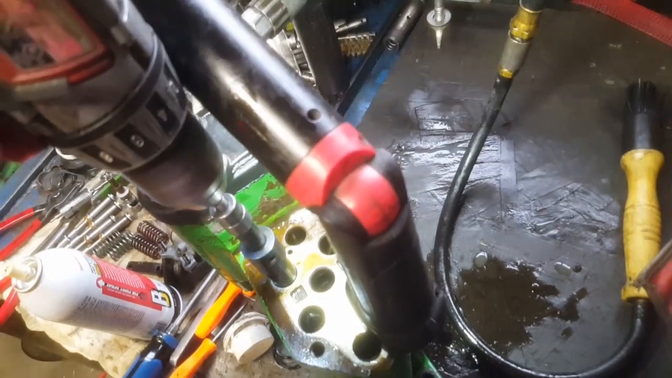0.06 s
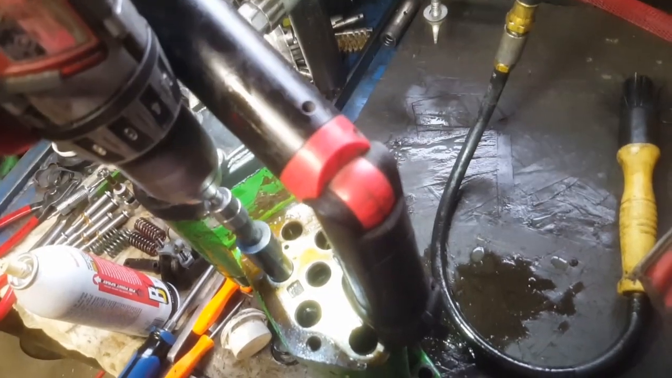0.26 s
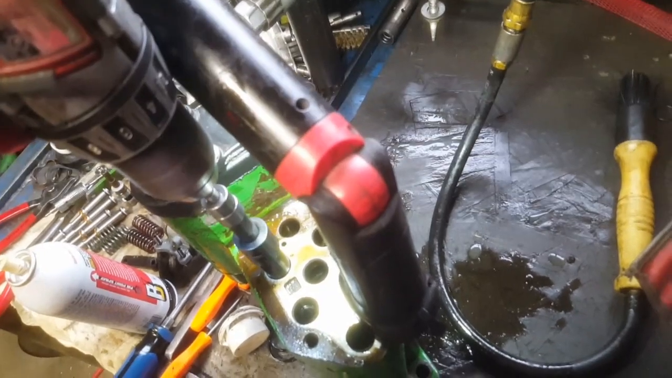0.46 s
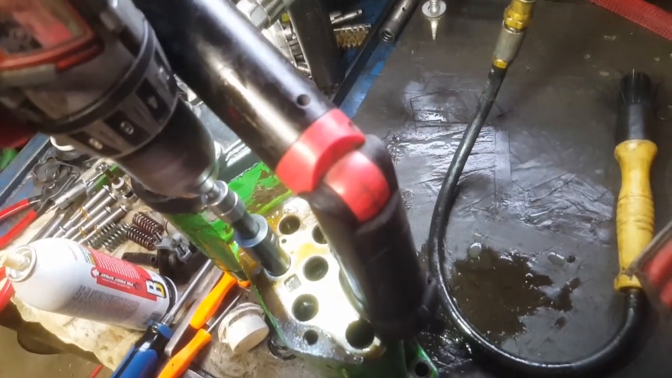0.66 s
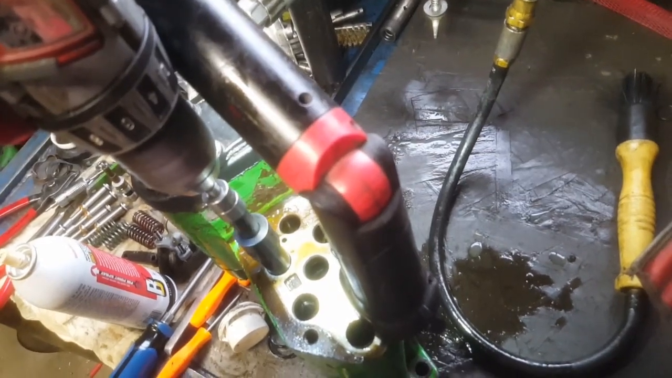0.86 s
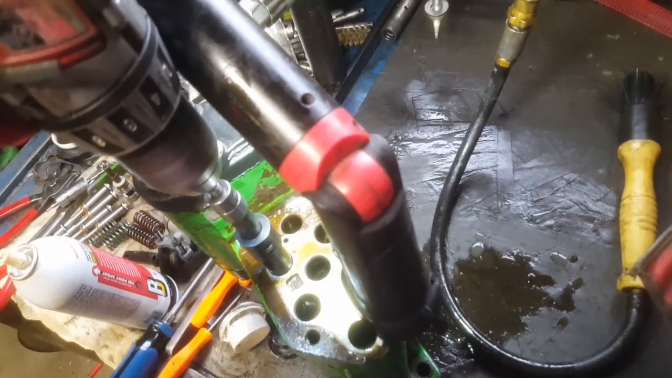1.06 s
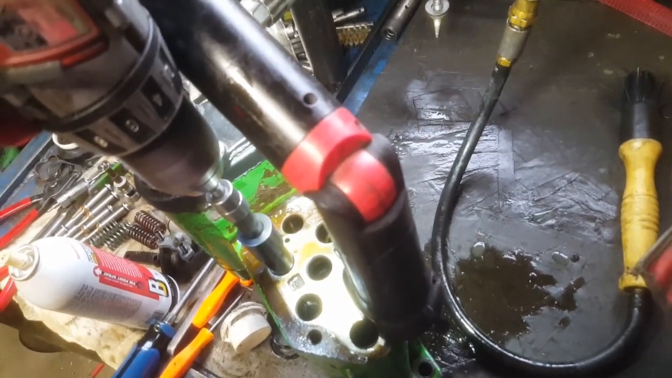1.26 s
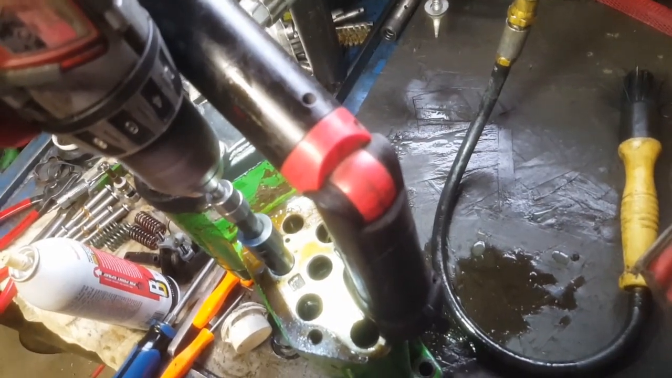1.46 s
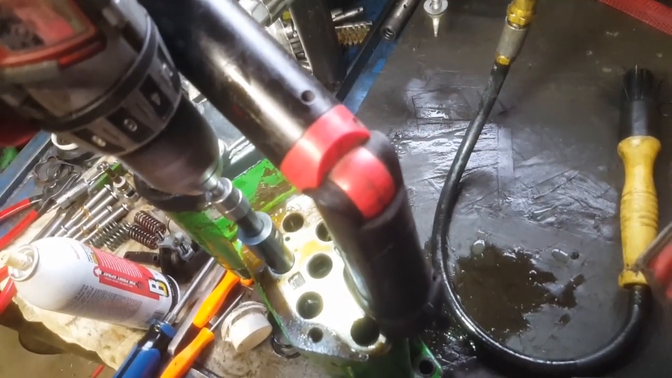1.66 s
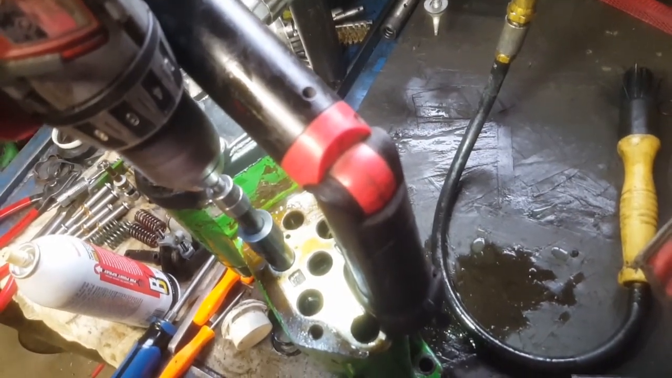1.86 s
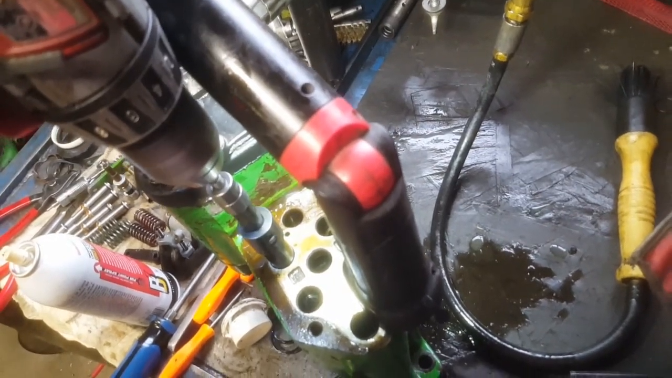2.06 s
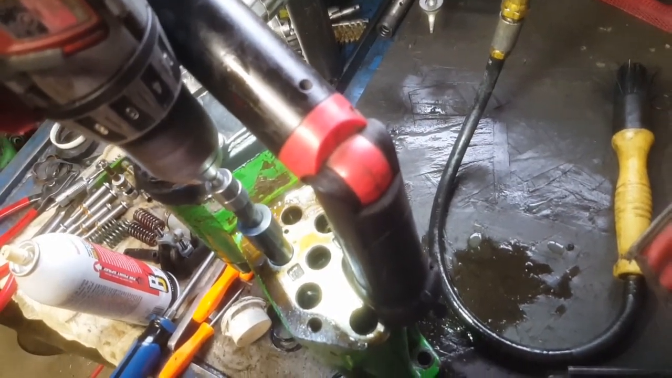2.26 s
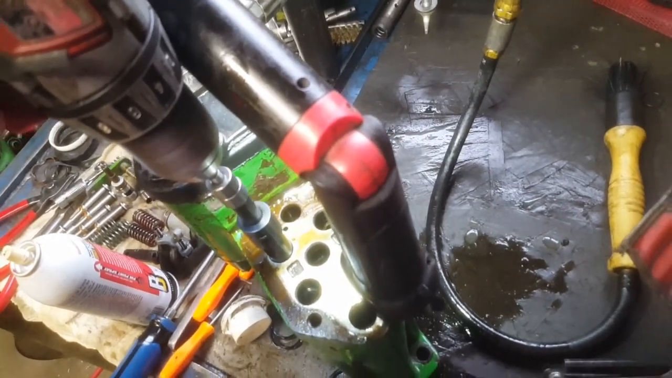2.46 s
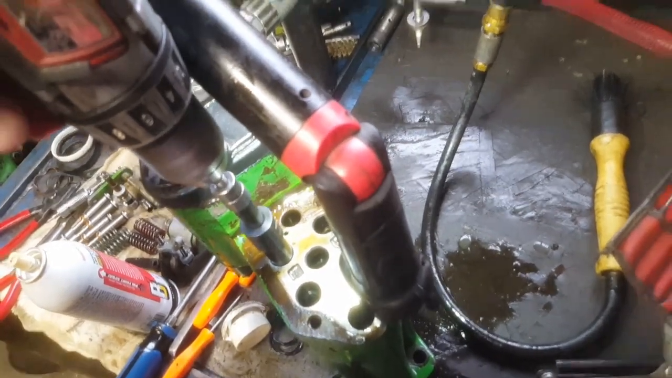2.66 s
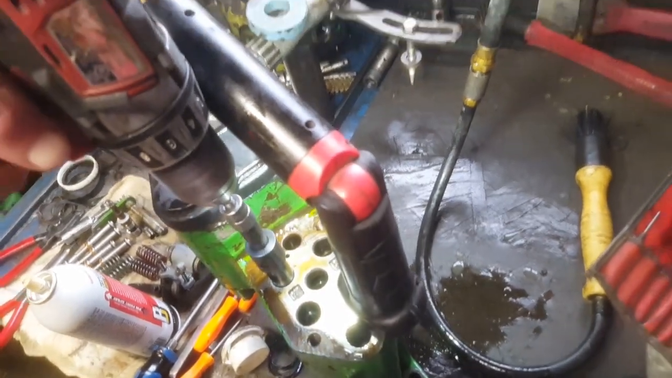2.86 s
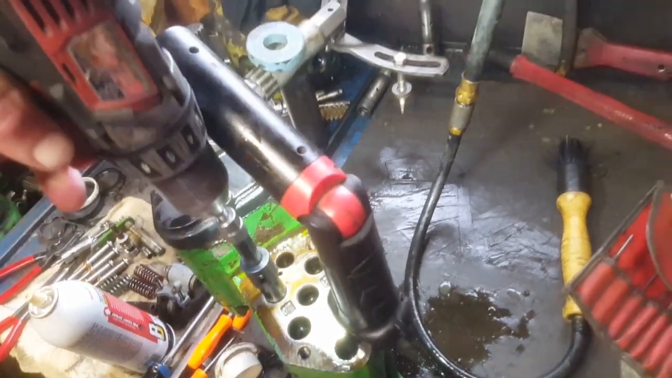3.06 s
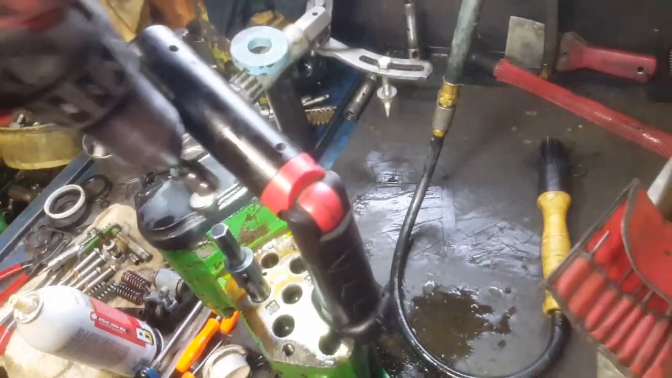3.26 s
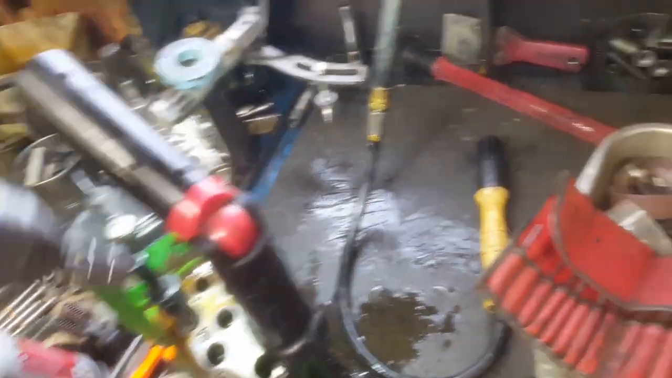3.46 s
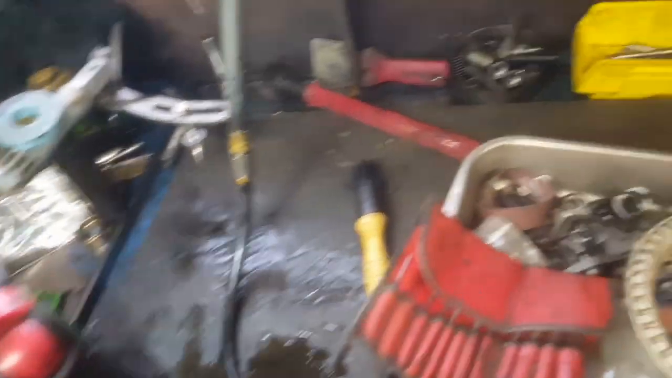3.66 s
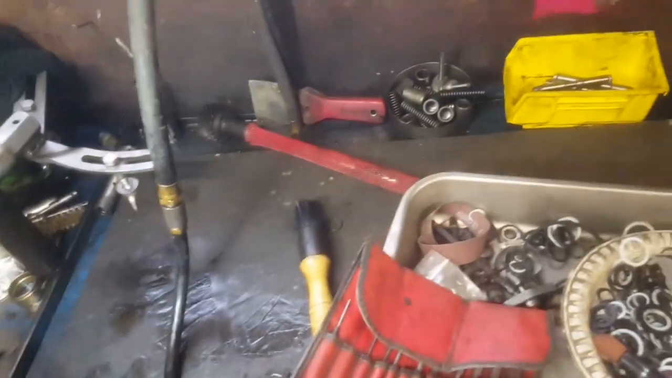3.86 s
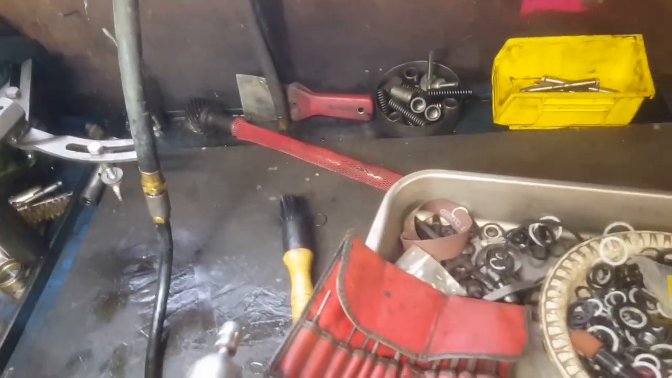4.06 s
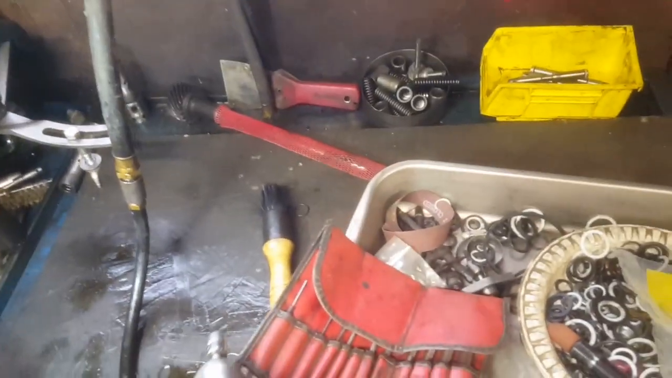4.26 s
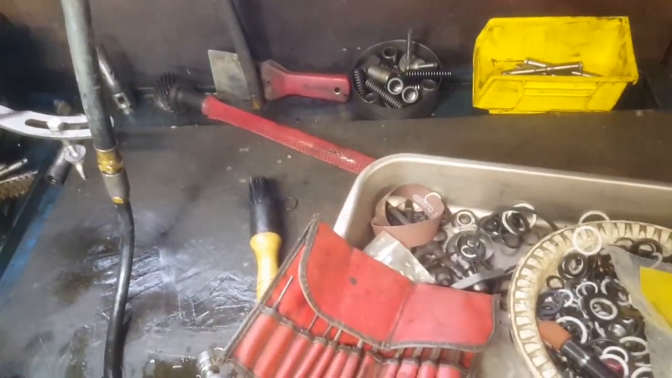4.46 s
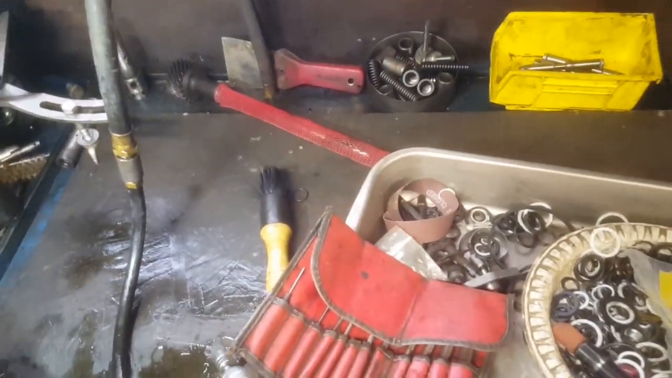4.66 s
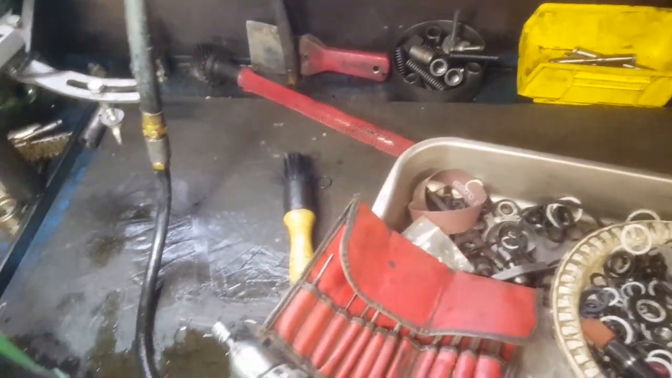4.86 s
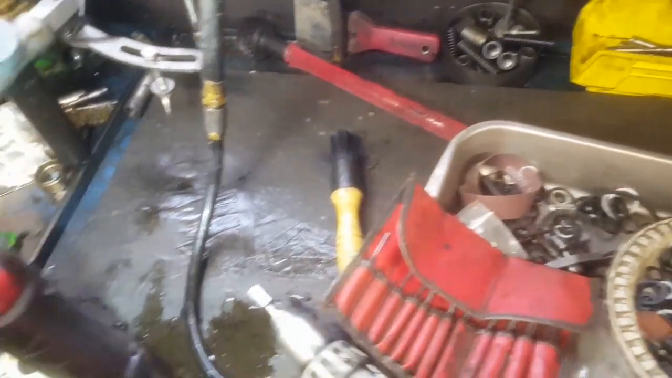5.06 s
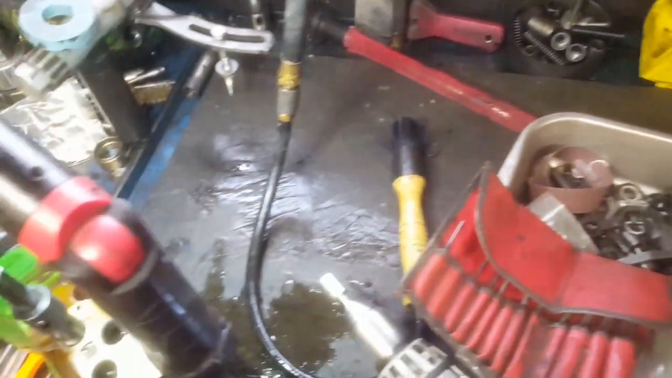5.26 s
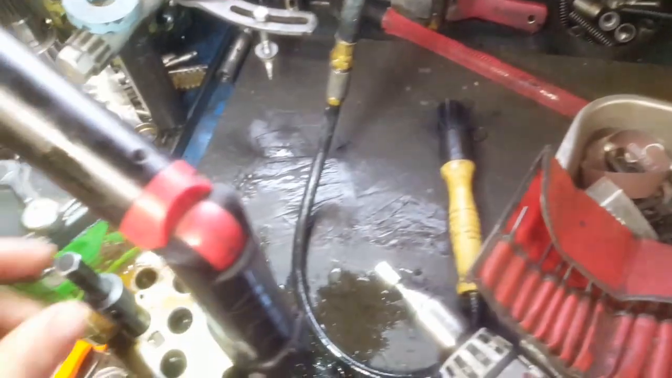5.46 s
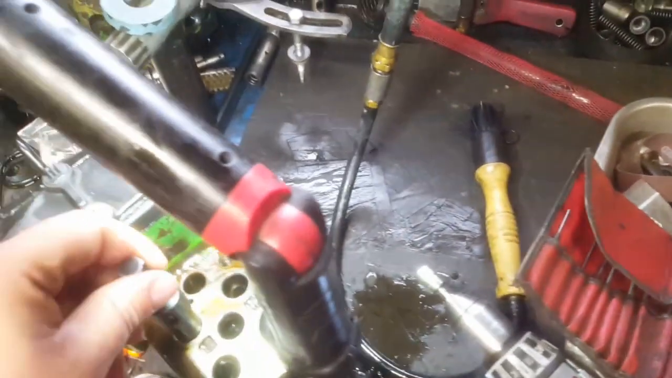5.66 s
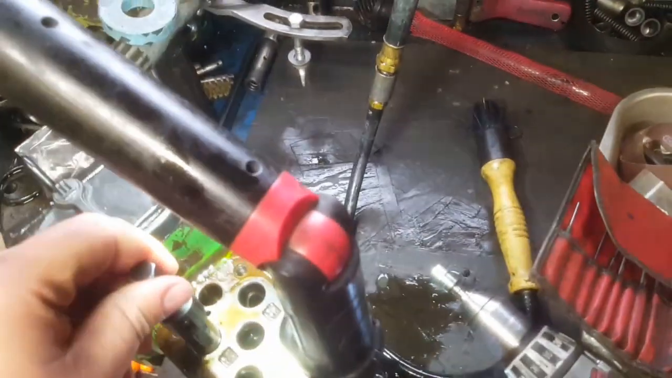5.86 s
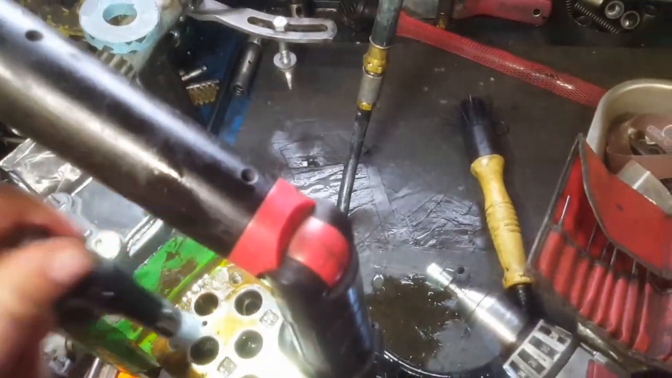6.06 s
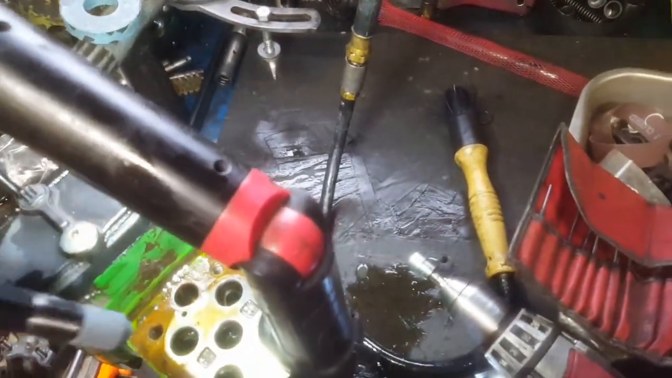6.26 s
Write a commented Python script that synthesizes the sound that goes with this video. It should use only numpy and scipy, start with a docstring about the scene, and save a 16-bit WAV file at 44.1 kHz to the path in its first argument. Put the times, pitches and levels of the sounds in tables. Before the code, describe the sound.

From 0 to 2.95 seconds a cordless drill runs close to the microphone, honing a metal block: a loud, dense whir with motor whine, gear growl and bright gritty hiss. It gathers its last bit of speed in the first tenth of a second, then holds nearly steady with slight wavering. At 2.95 it brakes sharply, the pitch collapsing with a brief falling squeal; small chuck clicks follow until 3.2. Low workshop hum fades to near quiet. Light taps come at 4.2 and 4.4, then the drill lands on a steel bench: a sharp clack at 4.8 with rattle, smaller ticks and scuffs, and heavier, boomy thuds from 5.05 to 5.2, ringing away shortly. After a pause, from 5.8 to 6.05, faint grainy rasps and thin squeaks sound as the hone is twisted from its bore. Soft room noise remains until 6.3.

```python
"""Cordless drill honing, then set down on a bench

A drill spins a hone in a metal valve body: shaft tones and pulsing noise slow down and squeal at the brake.
Laid on the steel bench, it clicks, knocks and scuffs, all bursts of noise; the bench rings at its own pitches.
Fingers then twist the hone out of its bore: grainy rasps and narrow noise squeaks.
A workshop hums softly as banded noise and answers with an echo of fading noise."""
import sys
import numpy as np
from scipy import signal
from scipy.fft import rfft, irfft, next_fast_len
from scipy.io import wavfile
from scipy.ndimage import uniform_filter1d, map_coordinates

SR = 44100
rng = np.random.default_rng(int(sys.argv[2]) if len(sys.argv) > 2 else 0)


def output_pcm(signal):
    """Save a mono or channel-first signal as 16-bit PCM at the path in sys.argv[1].

    Samples are clipped to [-1, 1] before scaling.
    """
    pcm = np.clip(np.atleast_2d(signal).T, -1, 1) * 32767
    wavfile.write(sys.argv[1], SR, np.round(pcm).astype(np.int16))


N = 278403
T = np.arange(N) / SR  # time in s
BRAKE_S = 2.945  # the brake comes on
PORT_LAG_S = -.00036  # left arrival minus right: the drill is nearer the left microphone port
BOOM_HZ = 125  # lowest pitch of the bench top


def amp(db):
    """Decibels turned into a gain."""
    return 10 ** (np.asarray(db) / 20)


def unit(x):
    """x scaled to an average power of one."""
    return x / np.sqrt(np.mean(x ** 2) + 1e-20)


def along(points, hz):
    """Columns of (Hz, value, ..) points, read off at hz on a log axis."""
    f, *cols = np.transpose(points)
    return np.array([np.interp(np.log(hz + 1), np.log(f + 1), c) for c in cols])


def wobble(rate):
    """A smooth random curve through rate knots a second."""
    coarse = T[::48]
    knots = rng.standard_normal(int(N * rate / SR) + 4)
    return np.interp(T, coarse, map_coordinates(knots, [coarse * rate]))


def swells(s, rise_s, fall_s, db, hold_s=0):
    """Gain of the loudest of several swells: straight in dB up to s, a hold, straight down."""
    # rise and fall are the times for 20 dB; their signs do not matter
    s, rise_s, fall_s, db, hold_s = [np.reshape(v, (-1, 1)) for v in (s, rise_s, fall_s, db, hold_s)]
    t = T[::16]
    rising = (s - t) / np.abs(rise_s)
    falling = np.maximum(t - s - hold_s, 0) / np.abs(fall_s)
    slope = np.where(t < s, rising, falling)
    return np.interp(T, t, amp(np.max(db - 20 * slope, axis=0)))


def filtered(x, response):
    """x times a complex response of frequency."""
    m = next_fast_len(N + 8192, real=True)  # spare room for the ringing
    return irfft(rfft(x, m) * response(np.fft.rfftfreq(m, 1 / SR)), m)[..., :N]


def modes(table):
    """Response of (Hz, width Hz, dB) resonances that ring after a push, with alternating signs."""
    return lambda f: sum((-1) ** k * amp(db) * 1j * f * w / (c * c - f * f + 1j * f * w)
                         for k, (c, w, db) in enumerate(table))


def band(x, lo_hz, hi_hz):
    """One part of a smooth split; neighbouring parts add up in power."""
    return filtered(x, lambda hz: np.sqrt(1 / (1 + (hz / hi_hz) ** 6) - 1 / (1 + (hz / lo_hz) ** 6) + 1e-12))


def ports(table, lag, drive=1):
    """Noise at both ports: a shared part arriving with a lag and a part of each port's own."""
    def response(hz, shared):
        left_db, right_db, alike = along(table, hz)
        alike = np.clip(alike, 0, 1)
        delay = np.exp(-1j * np.pi * hz * lag * np.array([[1], [-1]]))
        return amp([left_db, right_db]) * delay * np.sqrt(alike if shared else 1 - alike)

    both, left, right = rng.standard_normal((3, N)) * drive
    own = filtered(np.array([left, right]), lambda hz: response(hz, False))
    return filtered(both, lambda hz: response(hz, True)) + own


def patchy(x, db):
    """x with a random gain field, smooth over some 400 Hz and 40 ms."""
    z = signal.stft(x, nperseg=512)[2]
    field = uniform_filter1d(rng.standard_normal(z.shape[1:]), size=5, axis=0)
    field = uniform_filter1d(field, size=7, axis=1)
    return signal.istft(z * amp(db * unit(field)), nperseg=512)[1][:, :N]


def grit(points, spiky_db, rate):
    """Two channels of friction noise in uneven grains."""
    grains = rng.standard_normal((2, N)) * amp(spiky_db * wobble(rate))
    return unit(filtered(grains, lambda hz: amp(along(points, hz))))


def drill():
    """Shaft tones, whirring noise, bench shake and brake squeal, faded layer by layer after the brake."""
    # gear growl, stone whirr, fan hiss, lower whine, upper whine, bench shake; extra is added at 0 s and dies
    # away, and the fall starts a hold after the brake: gain_db, extra_db, hold_s, fall_db_per_s
    layers = [(4, 2.5, 0.053, 270.5), (0.38, 0.5, .03, 288), (0, 1, 0.04, 500), (-.5, -24, 0.001, 900),
              (0, -6, 0.001, 900), (-32.5, -9.5, .04, 150)]
    # how hard the drill works: time_s, level_db (on top of the layer gains)
    load = [(0, -16.5), (.7, -16), (1.6, -16), (2.5, -16.5), (2.95, -17.5)]
    settle_s = 0.11  # time constant with which the extra dies
    growl_db, stone_db, fan_db, low_db, upper_db, shake_db = [
        db + extra_db * np.exp(-T / settle_s) - fall * np.maximum(T - BRAKE_S - hold_s, 0)
        for db, extra_db, hold_s, fall in layers]
    whirr = amp(np.interp(T, *np.transpose(load)))
    speed, turn = shaft()
    noise = whirr * whirring(turn, growl_db, stone_db, fan_db)
    shaking = amp(shake_db) * whirr * bench_shake()
    return noise + motor_tones(speed, turn, low_db, upper_db) + shaking + brake_squeal()


def shaft():
    """Speed and angle of the shaft: it gathers the last of its speed, then slows exponentially at the brake."""
    # motor shaft under the changing drag, ahead of spin-up and braking: time_s, speed_turns_per_s
    drag_speed = [(0.3, 276.3), (0.49, 276.2), (0.58, 274.9), (0.67, 274.1), (0.76, 275.6), (0.9, 275.1),
                  (1.08, 275.6), (1.19, 274.3), (1.28, 275.0), (1.36, 274.5), (1.45, 275.1), (1.63, 274.6),
                  (1.71, 273.8), (1.85, 274.5), (1.97, 275.6), (2.15, 273.7), (2.32, 273.3), (2.41, 273.7),
                  (2.5, 273.4), (2.63, 274.1), (2.74, 275.9), (2.84, 274.6), (2.93, 275.2)]
    missing_share, spin_up_s, slow_s = .134, .078, .07  # speed missing at 0 s; two time constants
    speed = np.interp(T, *np.transpose(drag_speed))
    speed = speed * (1 - missing_share * np.exp(-T / spin_up_s))
    speed = speed * np.exp(-np.maximum(T - BRAKE_S, 0) / slow_s)
    turn = 2 * np.pi * np.cumsum(speed * (1 + .0007 * wobble(20))) / SR
    return speed, turn


def whirring(turn, growl_db, stone_db, fan_db):
    """Gear, stone and fan noise that pulses once a turn and is coloured by the drill casing."""
    # noise colour, only its shape counts: pitch_hz, left_db_per_hz, right_db_per_hz, left_right_likeness (0-1)
    colour = [(40.0, -95.5, -89, 0.41), (186, -69.5, -74.5, 1), (480.0, -66.5, -65, 0.93),
              (1200, -63.5, -67.5, 0.72), (1940, -59.5, -62.5, 0.72), (2150.0, -60, -78, 0.43),
              (3150, -55, -52.5, 0.17), (4670, -51.5, -46.5, 0.48), (6420, -55.5, -51.5, 0.78),
              (7430, -58.5, -60, 0.21), (9500.0, -60, -71.5, 0.21), (11350, -62, -73, 0.51),
              (13800, -54, -70.5, 0.15), (15500.0, -58, -81, 0.092)]
    # resonances of the drill casing: pitch_hz, width_hz, level_db
    casing = [(1990, 220, 2), (3470, 180, -4.5), (5100, 810, -4)]
    # the hone drags unevenly as the chuck goes round
    drive = (1 + .11 * np.cos(turn)) * amp(.4 * wobble(12) + 0.39 * wobble(200))
    noise = patchy(ports(colour, PORT_LAG_S, drive), db=1.0)
    noise = unit(filtered(noise, lambda hz: 1 + abs(modes(casing)(hz))))
    growl, stone, fan = band(noise, 1, 1500), band(noise, 1500, 8500), band(noise, 8500, 30000)
    return amp(growl_db) * growl + amp(stone_db) * stone + amp(fan_db) * fan


def motor_tones(speed, turn, low_db, upper_db):
    """Sine tones at whole multiples of the shaft speed, each a little unsteady in level and phase."""
    # tones of the motor, ahead of the layer gains: multiple_of_shaft, left_db, right_db
    orders = [(1, -38, -44), (2, -38, -43), (3, -53, -61), (4, -44, -44), (5, -44, -44), (7, -42, -55),
              (8, -38, -46), (9, -48, -49), (10, -30, -31), (11, -47, -46), (12, -46, -70), (13, -40, -35),
              (15, -42, -31), (16, -47, -39), (17, -38, -32), (18, -39, -70), (20, -33, -27),
              (22, -59, -41), (24, -48, -64), (25, -55, -44), (30, -43, -53), (50, -45, -68)]
    upper_order, still_s = 12, 3.12  # the upper whine lies above this multiple; the shaft is silent from here
    tones, run = np.zeros((2, N)), T < still_s
    for k, left_db, right_db in orders:
        lag = np.pi * k * speed[run] * PORT_LAG_S * np.array([[-1], [1]])
        unsteady = .15 if k % 10 == 0 else min(.05 * k, .5)  # the slot tones (each tenth) are steadier
        rough = unsteady * wobble(40)[run]
        layer_db = upper_db if k > upper_order else low_db
        # the two lowest tones skip the layer's fades until just after the brake
        layer_db = np.where((k < 3) & (T < 2.965), 0, layer_db)
        gain_db = min(.6 + 0.064 * k, 2.5) * wobble(9) + layer_db
        phase = k * turn[run] + lag + rough + rng.uniform(0, 2 * np.pi)
        tones[:, run] += amp([[left_db], [right_db]] + gain_db[run]) * np.sin(phase)
    return np.sqrt(2) * tones


def bench_shake():
    """The running drill shakes the bench at its lowest mode: noise through one resonance, twice."""
    shake = rng.standard_normal((2, N)) + 1.2 * rng.standard_normal(N)
    return unit(filtered(shake, lambda hz: modes([(BOOM_HZ, 55, 0)])(hz) ** 2))


def brake_squeal():
    """A brief sine swell at the brake whose pitch drops steeply."""
    # brake squeal, one row: peak_s, rise_s and fall_s (for 20 dB, sign ignored), level_db
    squeal_swell = (2.973, -0.03, 0.0047, -20)
    peak_hz, drop_hz_per_s = 1875, 20000
    hz = np.clip(peak_hz - drop_hz_per_s * (T - squeal_swell[0]), 1600, 2150)
    return swells(*squeal_swell) * np.sin(2 * np.pi * np.cumsum(hz) / SR)


def clicks():
    """Short bursts that ring the chuck, each with a small thud."""
    # brake catch, trigger and chuck settling: start_s, burst_db, thud_db (both relative), fall_60_db_s
    click_list = [(2.962, -40, -30, 0.03), (3.1042, -37, -54, 0.18), (3.1403, -27.5, -37.5, 0.053),
                  (3.1635, -37, -47, 0.03), (3.2158, -33.5, -51, 0.036)]
    # resonances of the chuck: pitch_hz, width_hz, level_db
    chuck = [(2080, 470, -1), (4100, 1100, -2), (4850, 580, 3.5), (6300, 1200, -9.5), (13100, 3300, -21.5)]
    burst, push = np.zeros((2, N)), np.zeros(N)
    for s, db, thud_db, t60 in click_list:
        burst += amp(db + 5.5 - 60 * np.abs(T - s) / t60) * (T >= s) * rng.standard_normal((2, N))
        push[round(s * SR)] = amp(thud_db + 43.5)
    thud = filtered(push, modes([(463, 130, 0)]))
    return filtered(burst, modes(chuck)) * amp([[-2.5], [2.5]]) + thud


def knocks():
    """Each contact: a burst of noise in a crack and an edge band and a push into the panels."""
    # drill meets bench: start_s, crack_db, thud_db (both relative), edge_over_crack_db, left_over_right_db
    contacts = [(4.039, -65.5, -60, -18, -4), (4.2007, -41, -69, -9.5, -2), (4.3822, -39, -35, -18, -4),
                (4.393, -35.5, -54, -12, 5), (4.7052, -47, -44, -12, -5.5), (4.7348, -39, -43, -9, 2),
                (4.7944, -29, -26, 6, -4), (4.7981, -25, -12.5, 5, 4), (4.8057, -17.5, -16.5, 2, -0.5),
                (4.8358, -35, -20, -4, -3), (4.8754, -40, -43, -12, -3.5), (4.909, -37, -35, -16, -1),
                (4.936, -37, -52, -20, -4), (5.0415, -45, -34, -2, 4), (5.0494, -30.5, -20.5, 3.5, -4),
                (5.1067, -35, -32, -16, -4), (5.1254, -25.5, -12.5, -28, 2), (5.1673, -26, -8, -7, 1),
                (5.183, -29.5, -39, -13, 0), (5.4116, -65, -53, -20, -2.5)]
    # colour of the crack: pitch_hz, level_db
    crack_colour = [(900, -1), (1500, -4), (2300, -3.5), (3200, -4.5), (5000, -11.5)]
    # colour of the sharp edge: pitch_hz, level_db
    edge_colour = [(4000, -8), (6500, 1), (9500, -7), (13500, -6.5), (16000, -6)]
    crack_t60_s, hard_db, longer_s_per_db = 0.032, -33, .0015  # blows above hard_db last longer
    crack, edge, push = np.zeros((2, N + SR)), np.zeros((2, N + SR)), np.zeros(N)
    t = np.arange(SR // 5) / SR
    for s, db, thud_db, edge_db, pan_db in contacts:
        i = round(s * SR)
        t60 = crack_t60_s + longer_s_per_db * max(db - hard_db, 0)
        level_db = db - 60 * t / t60 + np.array([[.5], [-.5]]) * pan_db
        burst = amp(level_db) * rng.standard_normal((2, len(t)))
        crack[:, i:i + len(t)] += burst
        edge[:, i:i + len(t)] += amp(edge_db) * burst
        push[i] = amp(thud_db + 30)
    crack = filtered(crack[:, :N], lambda hz: amp(along(crack_colour, hz) + 1)
                     / (1 + (hz / 6000) ** 6) / (1 + (500 / (hz + 1)) ** 4))
    edge = filtered(edge[:, :N], lambda hz: amp(along(edge_colour, hz) - 10) / (1 + (3000 / (hz + 1)) ** 6))
    return crack + edge + panels(push)


def panels(x):
    """The bench panels ring at their own pitches and are dull towards the top."""
    # bench panels: pitch_hz, width_hz, level_db
    panel_modes = [(253, 35.5, 1), (383, 54, 4), (767, 87, -3.5), (1260, 200, -23)]
    return filtered(x, lambda hz: modes(panel_modes)(hz) / (1 + 1j * hz / 1200) ** 2)


def bench():
    """The top booms near one pitch, its panels rattle and its legs shudder while the drill rocks on it."""
    # the drill rocks: start_s, hold_s, boom_db, rattle_db, shudder_db
    rocking = [(4.389, 0.045, -39, -65, -54), (4.805, 0.043, -30.5, -39.5, -49),
               (4.864, 0.023, -33.5, -38.5, -55), (4.904, 0.015, -34, -47, -56),
               (5.043, 0.017, -42, -42, -54), (5.085, 0.039, -35.5, -55, -54),
               (5.135, 0.057, -21.5, -43, -48), (5.209, 0.031, -31.5, -44.5, -53),
               (5.267, .02, -40.5, -58, -58), (5.328, .04, -53, -62.5, -61)]
    rise_s, boom_fall_s, rattle_fall_s, shudder_fall_s = 0.01, 0.052, 0.04, 0.14  # each for 20 dB
    s, hold_s, boom_db, rattle_db, shudder_db = np.transpose(rocking)
    boom = np.sin(2 * np.pi * np.cumsum(BOOM_HZ * (1 + 0.0505 * wobble(30))) / SR)
    blur = unit(filtered(rng.standard_normal(N), lambda hz: modes([(150, 110, 0)])(hz) ** 2))
    boom = unit(boom + 0.44 * blur)
    rattle = unit(panels(rng.standard_normal(N) * amp(2 * wobble(80))))
    shudder = rng.standard_normal((2, N)) + rng.standard_normal(N)
    shudder = unit(filtered(shudder, lambda hz: modes([(62, 50, 0)])(hz) ** 2))
    parts = [(boom_fall_s, boom_db, boom), (rattle_fall_s, rattle_db, rattle),
             (shudder_fall_s, shudder_db, shudder)]
    return sum(swells(s, rise_s, fall_s, db, hold_s) * part for fall_s, db, part in parts)


def rubbing():
    """Friction noise, a little to the right: the drill scuffs over the bench, the hone rasps and squeaks."""
    return (scuffs() + rasps() + squeaks()) * amp([[-1.5], [1.5]])


def scuffs():
    """The drill slides on the bench: swells of even friction noise."""
    # slides, ahead of the panning: peak_s, rise_s and fall_s (for 20 dB), level_db
    slides = [(4.386, 0, 0.04, -52), (4.74, .045, .25, -49), (4.82, .01, .05, -44),
              (4.876, .08, .09, -43.5), (5.09, .12, .2, -50.5), (5.15, .05, .06, -47),
              (5.182, 0.05, 0.03, -42)]
    # colour of the scuffing, only its shape counts: pitch_hz, level_db_per_hz
    scuff_colour = [(350, -33), (600, -0.5), (748, -7), (970, -11.5), (1900, -21), (2910, -15.5),
                    (6290, -18), (10200, -35), (16000, -32)]
    return swells(*np.transpose(slides)) * grit(scuff_colour, spiky_db=0.0, rate=200)


def rasps():
    """The hone rasps in its bore as it is twisted: swells of grainy friction noise."""
    # twists, ahead of the panning: start_s, hold_s, level_db
    twists = [(5.82, .045, -62), (5.875, .07, -55.5), (5.968, .012, -53.5), (5.99, .035, -54)]
    # colour of the rasp, only its shape counts: pitch_hz, level_db_per_hz
    rasp_colour = [(590, -43), (1000, -19), (1450, -13), (1710, -11), (2010, -9), (4410, -8), (5250, -7.5),
                   (16000, -37.5)]
    s, hold_s, db = np.transpose(twists)
    return swells(s, .03, .014, db, hold_s) * grit(rasp_colour, spiky_db=3, rate=410)


def squeaks():
    """The hone squeaks: one grainy noise through a narrow resonance for each squeak."""
    # squeaks, ahead of the panning: start_s, hold_s, pitch_hz, level_db
    squeak_list = [(5.815, 0.016, 3400, -71), (5.885, .035, 6300, -66), (5.885, 0.05, 3600, -63),
                   (5.887, .04, 5200, -55), (5.892, 0.016, 1800, -65.5), (5.929, .008, 5170, -55),
                   (5.932, 0.01, 2670, -47.5), (5.956, .012, 3700, -60), (5.986, 0.031, 5000, -60)]
    rise_s, fall_s, width_share = .006, 0.015, .07  # times for 20 dB; width as a share of the pitch
    out = np.zeros(N)
    grains = rng.standard_normal(N) * amp(3.4 * wobble(150))
    for s, hold_s, hz, db in squeak_list:
        narrow = unit(filtered(grains, lambda f: modes([(hz, width_share * hz, 0)])(f) ** 2))
        out += swells(s, rise_s, fall_s, db, hold_s) * narrow
    return out


def shop():
    """The background noise in three bands; its rumble, rustle and hiss rise when someone moves."""
    # workshop colour, shape within each band: pitch_hz, left_db_per_hz, right_db_per_hz, likeness (0-1)
    shop_colour = [(40.3, -89, -95.5, 0.37), (80, -87.5, -77.5, 0.82), (151, -84, -85, 0.39),
                   (292, -83, -83.5, 0.78), (749, -99.4, -93.5, 0.9), (1380, -101.0, -100.5, 0.18),
                   (3000, -107.1, -105.8, 0.092), (4900, -110.0, -107.4, 0.2002),
                   (7900, -113.3, -114.5, 0.27), (12000, -116.2, -118.5, 0.34),
                   (15500, -117.2, -120.0, 0.35)]
    # colour that the ports give to far sound: pitch_hz, level_db
    port_colour = [(6000, -2), (10000, -3.5), (13000, 0.5), (16000, -0.5)]
    # background levels: time_s, rumble_db, rustle_db, hiss_db
    air_levels = [(3.2, -51.5, -69, -59.5), (3.5, -61, -68.5, -69), (3.9, -66.5, -74, -67.5),
                  (4.08, -67.5, -75, -75), (4.65, -67, -71, -75), (5.45, -65.5, -72, -71.5),
                  (5.78, -60.5, -71, -70.5), (6.05, -63, -69, -70), (6.17, -64.5, -64, -68),
                  (6.31, -64, -66.5, -70)]
    s, *levels = np.transpose(air_levels)
    air = filtered(ports(shop_colour, 0), lambda hz: amp(along(port_colour, hz))) * amp(.8 * wobble(7.6))
    parts = band(air, 1, 1000), band(air, 1000, 3000), band(air, 3000, 30000)
    return sum(amp(np.interp(T, s, db)) * unit(part) for db, part in zip(levels, parts))


def echo(x):
    """The room's answer: x smeared by noise in which each frequency dies at its own speed."""
    # how fast the room falls silent: pitch_hz, fall_60_db_s
    room_decay = [(150, 0.7), (700, 1.1), (2000, 1.1), (5000, 0.3), (14000, 0.25)]
    hz, t, z = signal.stft(rng.standard_normal((2, SR)), SR, nperseg=256)
    tail = signal.istft(z * amp(-60 * t / along(room_decay, hz).T), SR, nperseg=256)[1]
    return signal.fftconvolve(x, tail / np.linalg.norm(tail[0]), axes=1)[:, :N]


def scene():
    """The drill and the handling sounds, each with its echo, over the workshop."""
    motor = drill()
    near = clicks() + knocks() + rubbing() + bench()
    return motor + amp(-24.5) * echo(motor) + near + amp(-20.5) * echo(near) + shop()


def record(dry):
    """The input stage rounds off the highest peaks; next to nothing is kept above the band limit."""
    top_hz = 15900
    soft = dry / (1 + np.abs(dry / .95) ** 6) ** (1 / 6)
    return filtered(soft, lambda hz: 1 / (1 + (hz / top_hz) ** 300))


dry = scene()
out = record(dry)
output_pcm(out)
```